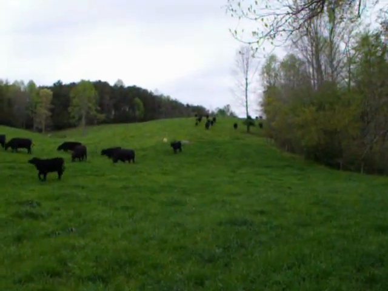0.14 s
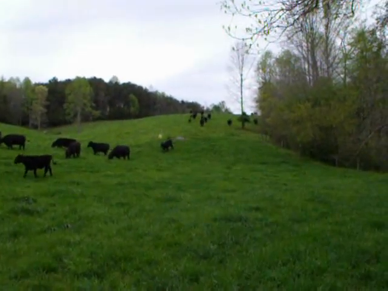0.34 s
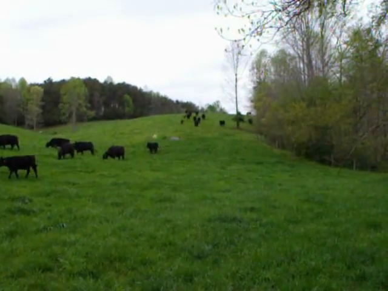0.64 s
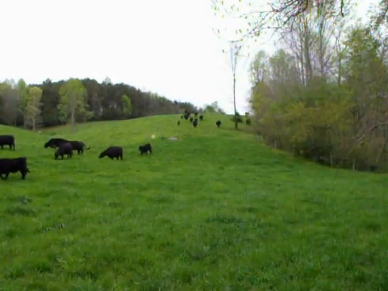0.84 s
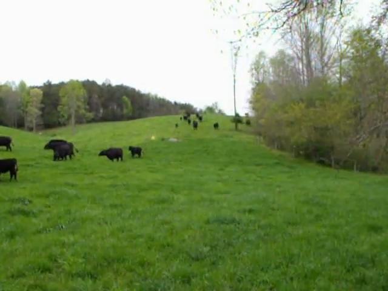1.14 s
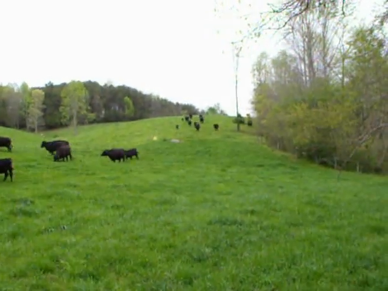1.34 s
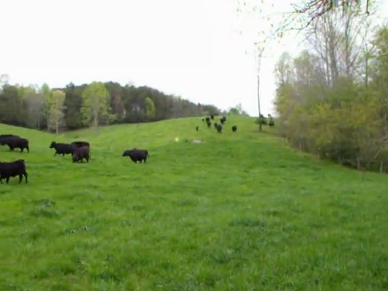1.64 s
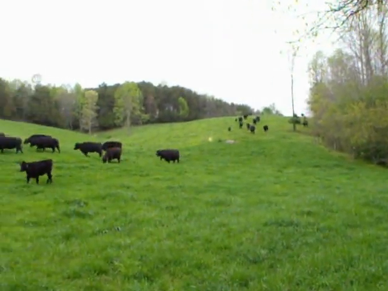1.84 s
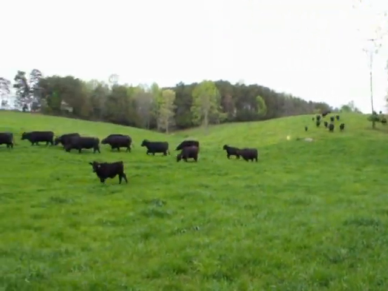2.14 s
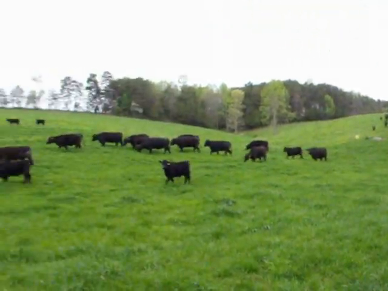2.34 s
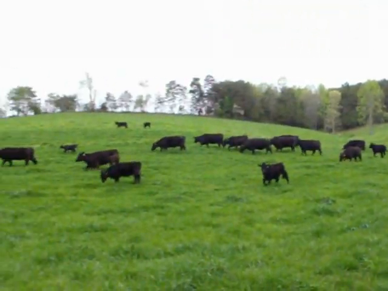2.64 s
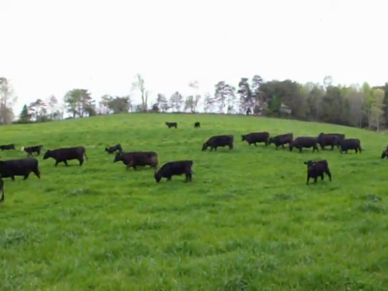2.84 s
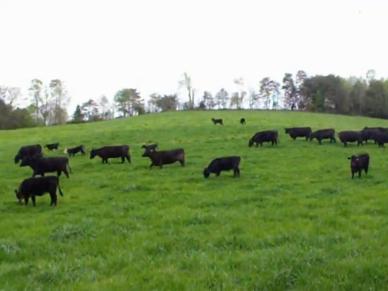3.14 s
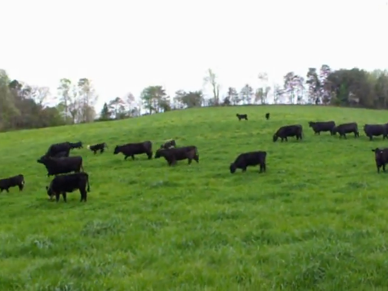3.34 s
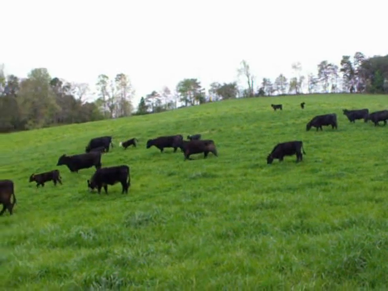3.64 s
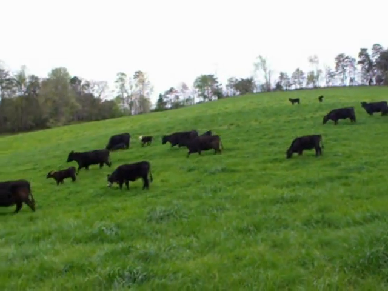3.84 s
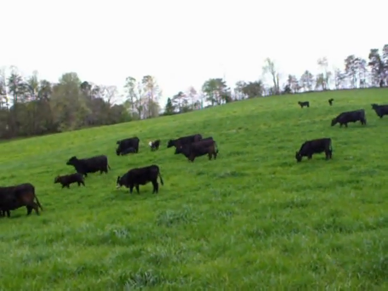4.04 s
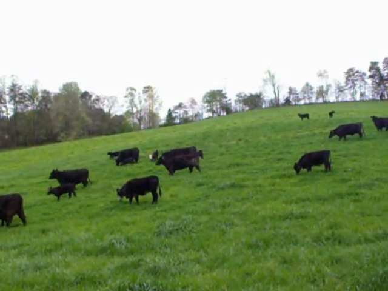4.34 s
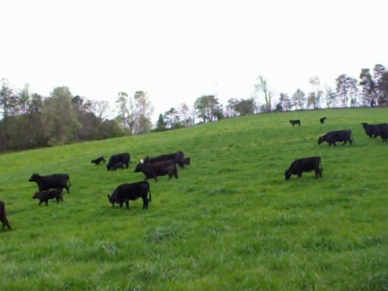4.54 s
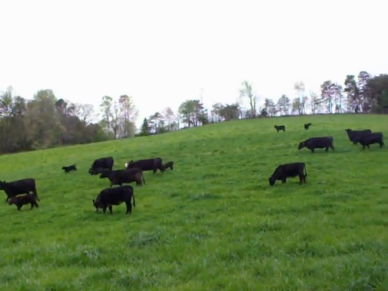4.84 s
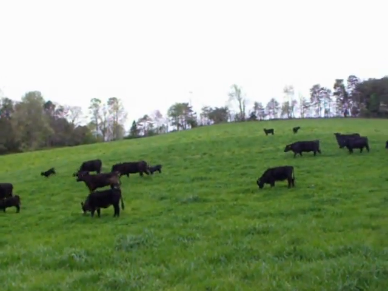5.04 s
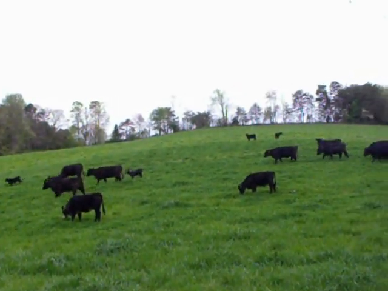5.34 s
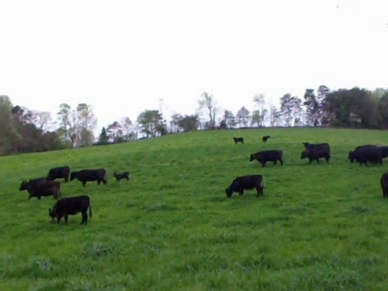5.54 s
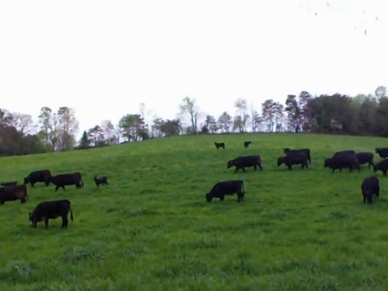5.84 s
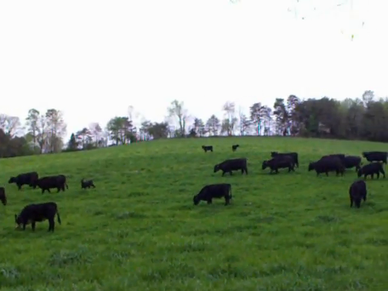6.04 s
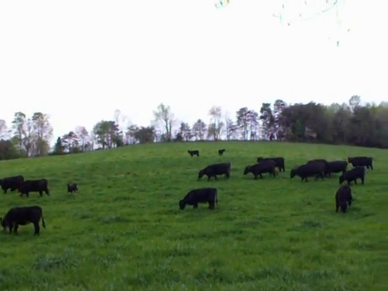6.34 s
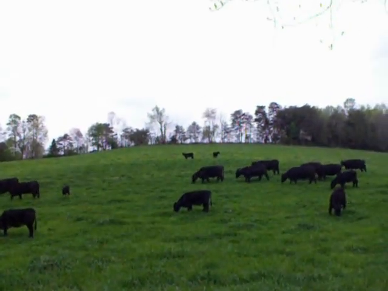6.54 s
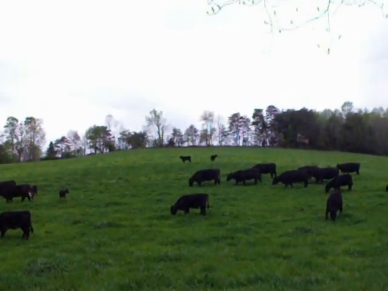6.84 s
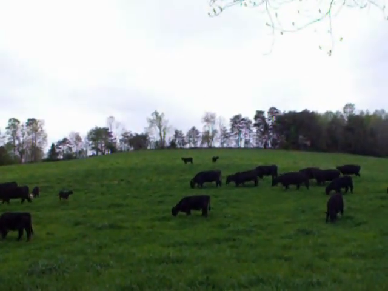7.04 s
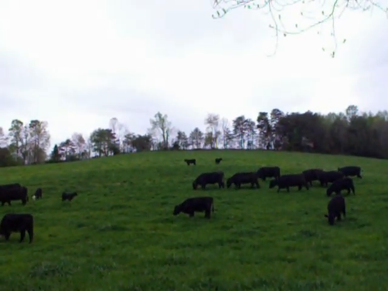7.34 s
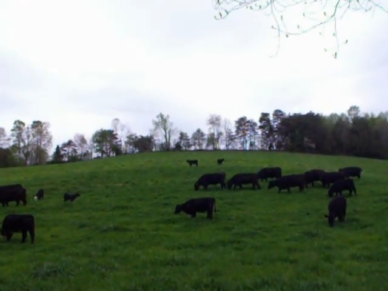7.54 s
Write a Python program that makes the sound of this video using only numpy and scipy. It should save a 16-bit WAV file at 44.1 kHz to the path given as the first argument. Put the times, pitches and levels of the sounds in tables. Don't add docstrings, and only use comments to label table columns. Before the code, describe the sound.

Calves bleat in short nasal calls while a cow hums into two moos and snorts, over windy grass, camera taps and steady hiss.

```python
import sys
import numpy as np
from scipy import signal
from scipy.fft import rfft, irfft, next_fast_len
from scipy.io import wavfile
from scipy.ndimage import uniform_filter1d, map_coordinates

SR = 44100
rng = np.random.default_rng(int(sys.argv[2]) if len(sys.argv) > 2 else 0)


def file_out(sig):
    cols = np.atleast_2d(sig).T
    lim = np.clip(cols, -1, 1)
    pcm = np.round(lim * 32767).astype(np.int16)
    wavfile.write(sys.argv[1], SR, pcm)


def amplitude_ratio(level_db):
    exponent = np.asarray(level_db, float) / 20
    return 10 ** exponent


N = 339129


def unit(x):
    return x / np.sqrt(np.mean(np.abs(x) ** 2) + 1e-20)


def along(points, hz):
    f, v = np.transpose(points)
    return np.interp(np.log(hz + 1), np.log(f + 1), v)


def wobble(rate, size):
    knots = rng.standard_normal(int(size * rate / SR) + 4)
    return map_coordinates(knots, [np.arange(size) * rate / SR])


def filtered(x, response):
    m = next_fast_len(N + SR // 2)
    return irfft(rfft(x, m) * response(np.fft.rfftfreq(m, 1 / SR)), m)[..., :N]


def resonate(modes, f):
    total = 0
    for k, (centre, width, db) in enumerate(modes):
        damping = 1j * f * width
        total = total + (-1) ** k * amplitude_ratio(db) * damping / (centre * centre - f * f + damping)
    return total


def rush(spectrum, patchy_db):
    z = signal.stft(rng.standard_normal(N), nperseg=512)[2]
    field = uniform_filter1d(rng.standard_normal(z.shape), size=8, axis=0)
    field = uniform_filter1d(field, size=8, axis=1)
    x = signal.istft(z * amplitude_ratio(patchy_db * unit(field)), nperseg=512)[1][:N]
    return unit(filtered(x, lambda hz: amplitude_ratio(along(spectrum, hz))))


def held(start, length, db, attack, release, edge_db):
    end = start + length
    return [(start, db + edge_db), (start + attack, db), (end - release, db), (end, db + edge_db)]


def unroll(rows, step=1):
    s, *cols = np.transpose(rows)
    t = np.arange(round(s[0] * SR), min(round(s[-1] * SR), N), step) / SR
    cut_off = s[-1] > N / SR - .01
    fade = np.clip(np.minimum(t - s[0], s[-1] + cut_off - t) / .015, 0, 1)
    return round(s[0] * SR), fade, [np.interp(t, s, c) for c in cols]


def shaped(calls, poses, gape):
    wide, narrow = np.array(gape)
    shaped_calls = []
    for rows, pose in zip(calls, poses):
        moved = []
        for s, hz, db, opening in rows:
            throat = np.array(pose) + max(opening, 0) * wide + min(opening, 0) * narrow
            moved.append((s, hz, db, *throat))
        shaped_calls.append(moved)
    return shaped_calls


def voice(calls, throat, pockets, facing_db, chest_db, rough, flicker_db, jitter):
    step = 32
    chest_gains = 0.76
    out = np.zeros(N)
    for rows, aim_db in zip(calls, facing_db):
        start, fade, (pitch, db, *_) = unroll(rows)
        slow, _, mouth, hump, muzzle, tongue, bright = unroll(rows, step=step)[2]
        cycles = np.cumsum(pitch * (1 + jitter * wobble(45, size=len(pitch)))) / SR
        stretch = muzzle / throat[4][0]

        modes = [(c, w, g + chest_db - chest_gains * aim_db) for c, w, g in throat[:2]]
        modes += [(mouth, *throat[2][1:])]
        modes += [(hump, throat[3][1], throat[3][2] + tongue)]
        modes += [(c * stretch, w, g + bright + aim_db * (c > 3500)) for c, w, g in throat[4:]]
        order = np.arange(1, 56)[:, None]
        f = order * slow
        weights = resonate(modes, f)
        for c, floor, rim in pockets:
            gap = (c * stretch) ** 2 - f * f
            weights = weights * (gap + 1j * f * floor) / (gap + 1j * f * rim)
        weights = weights / np.sqrt(np.sum(np.abs(weights[6:15]) ** 2, axis=0) / 2)

        slack = np.clip(-np.gradient(np.log(slow)) * SR / step, 0, 2.5)
        fray = rough + .14 * uniform_filter1d(slack, size=30)
        fine, coarse = np.arange(len(pitch)), np.arange(len(slow)) * step
        for k, w in zip(order[:, 0], weights):
            breath = wobble(110 * step, size=len(w)) + 1j * wobble(110 * step, size=len(w))
            w = w * (amplitude_ratio(flicker_db * wobble(12 * step, size=len(w))) + fray * breath)
            turn = 2 * np.pi * k * cycles
            wave = np.interp(fine, coarse, w.real) * np.cos(turn)
            wave = wave - np.interp(fine, coarse, w.imag) * np.sin(turn)
            out[start:start + len(wave)] -= wave * amplitude_ratio(db) * fade
    return out


def preamp_hiss():
    # hz, level_db (per Hz)
    hiss_spectrum = [(12, -14), (20, -18), (22, -14.5), (91, -8.5), (120, -8.5), (195, -13.5), (495, -5),
                     (732, -4.5), (982, -3.5), (1260, -4), (1490, -4), (4490, -6.5), (4950, -5.5),
                     (6170, -18.5), (6970, -45.5), (9060, -81.5), (15300, -120)]
    hiss_db, frame_hz = -34.5, 60000 / 1001
    t = np.arange(N) / SR
    frame = np.tanh(4 * np.sin(2 * np.pi * frame_hz * (t - .004)))
    return amplitude_ratio(hiss_db - 3.0 + 1.5 * frame) * rush(hiss_spectrum, patchy_db=1.32)


def preamp_whine():
    # pitch_hz, level_db (rms)
    tones = [(5012, -53.5), (6013, -63)]
    t = np.arange(N) / SR
    out = np.zeros(N)
    for hz, db in tones:
        out += np.sqrt(2) * amplitude_ratio(db) * np.sin(2 * np.pi * (hz * t + 0.23 * wobble(6, size=N)))
    return out


def wind():
    # time_s, level_db (strength in the grass)
    gusts = [(0.0, -34.5), (.5, -38), (.95, -37), (1.4, -32.5), (2.0, -36), (2.9, -37), (3.6, -34.5),
             (4.1, -40.5), (4.7, -41), (5.3, -38.5), (6.0, -41.5), (6.6, -56.5), (7.69, -52)]
    # time_s, lift_db, length_s
    flurries = [(0.068, 0.5, 0.066), (.75, 6.5, 0.068), (1.056, 3, 0.022), (1.26, 2, 0.052),
                (1.646, 5, 0.078), (1.82, 2.5, 0.036), (2.139, 5, 0.097), (2.37, 8, 0.09),
                (2.697, 7, 0.044), (3.398, 3, .05), (3.634, 7.5, .03), (3.78, 7.5, 0.033),
                (3.928, 8.5, .03), (4.034, 3, .04), (4.938, 4, .03), (5.024, 6, 0.033)]
    # hz, level_db (per Hz)
    grass_spectrum = [(300, -16.5), (700, -5.5), (1500, -3.5), (3000, -0.5), (4500, -0.5), (5500, 2),
                      (7500, -16)]
    # hz, level_db (per Hz)
    rumble_spectrum = [(20, -6.5), (60, -8.5), (200, -10.5), (600, -24), (1200, -33.5)]
    buffet_level_db, buffet_follows = -44, 0.07
    t = np.arange(N) / SR
    grass_db = np.interp(t, *np.transpose(gusts))
    for s, db, length in flurries:
        grass_db = grass_db + db * np.exp(-((t - s) / length) ** 2)
    buffet_db = buffet_level_db + buffet_follows * (grass_db - grass_db.mean())
    grass = amplitude_ratio(grass_db + 1.0 * wobble(30, size=N)) * rush(grass_spectrum, patchy_db=2.5)
    buffet = amplitude_ratio(buffet_db - 2.5 + 1.2 * wobble(9, size=N)) * rush(rumble_spectrum, patchy_db=0.5)
    return grass + buffet


def taps():
    # time_s, peak_db, pitch_hz, t60_s
    touches = [
        (0.4356, -25.5, 625, 0.014),
        (2.6756, -11, 3280, 0.014),
        (2.6869, -19, 2880, .008),
        (5.607, -25, 460, 0.042),
        (5.623, -32.5, 498, 0.056),
        (5.635, -28.5, 450, 0.069),
        (5.72, -25.5, 500, 0.11),
    ]
    out, t = np.zeros(N + SR), np.arange(SR // 10) / SR
    for s, db, hz, t60 in touches:
        puff = unit(signal.lfilter(*signal.iirpeak(hz, .7, SR), rng.standard_normal(len(t))))
        push = np.sin(2 * np.pi * hz * t) * (hz * t < 1)
        out[round(s * SR):][:len(t)] += amplitude_ratio(db) * (push + 0.66 * puff * amplitude_ratio(-60 * t / t60))
    return out[:N]


def treeline(x):
    t = np.arange(SR // 2) / SR
    tail = rng.standard_normal(len(t)) * amplitude_ratio(-60 * t / .5) * (t > .004)
    return signal.fftconvolve(x, tail / np.linalg.norm(tail))[:N]


def far_cows():
    # start_s, length_s, first_pitch_hz, held_pitch_hz, level_db
    hums = [
        (3.08, .48, 79.7, 97, -42.5),
        (5.6, .98, 69.1, 82.95, -47),
    ]
    # multiple of the pitch, level_db
    harmonics = [(1, -2.5), (2, -7.5), (3, -12.5)]
    rise_s, attack_s, release_s, edge_db = 0.3, .12, 0.13, -12
    out = np.zeros(N)
    for s, length, first_hz, held_hz, level_db in hums:
        start, fade, (db,) = unroll(held(s, length, level_db, attack_s, release_s, edge_db))
        pitch = np.interp(np.arange(len(fade)) / SR, [0, rise_s], [first_hz, held_hz])
        turn = 2 * np.pi * np.cumsum(pitch * (1 + .012 * wobble(14, size=len(fade)))) / SR
        hum = sum(amplitude_ratio(g + 1.1 * wobble(5.7, size=len(fade))) * np.sin(k * turn) for k, g in harmonics)
        out[start:start + len(fade)] += np.sqrt(2) * fade * amplitude_ratio(db) * hum
    return out


def snort():
    # start_s, length_s, level_db
    puffs = [
        (3.729, .12, -29.5),
        (3.843, 0.11, -23),
    ]
    # centre_hz, width_hz, level_db
    nose = [(340, 250, -12.5), (800, 110, -6), (990, 150, -0.5), (2040, 570, -5), (3010, 155, 0),
            (4380, 850, -16)]
    # time_s, level_db, pitch_hz, length_s
    whistles = [
        (3.899, -26.5, 990, 0.012),
        (3.918, -21.5, 800, 0.0065),
        (3.929, -17.5, 1986, 0.0084),
    ]
    attack_s, release_s, edge_db = 0.041, 0.029, -14.5
    flutter = amplitude_ratio(1.6 * wobble(120, size=N))
    air = unit(filtered(rng.standard_normal(N) * flutter, lambda f: resonate(nose, f)))
    out, t = np.zeros(N), np.arange(N) / SR
    for puff in puffs:
        start, fade, (db,) = unroll(held(*puff, attack_s, release_s, edge_db))
        out[start:start + len(fade)] += air[start:start + len(fade)] * amplitude_ratio(db) * np.sqrt(fade)
    for s, db, hz, length in whistles:
        swell = np.exp(-((t - s) / length) ** 2)
        out += amplitude_ratio(db) * swell * np.sin(2 * np.pi * hz * (t - s) * (1 + 2.6 * (t - s)))
    return out


def cow_mouth_shut():
    # time_s, pitch_hz, level_db, lip opening (-1..1)
    calls = [
        [(2.86, 93.4, -47, -0.46), (2.894, 100.5, -40.5, -1), (3.026, 113.9, -40, -0.25),
         (3.098, 119.1, -38.5, -0.37), (3.174, 132.9, -37.5, 0.045), (3.22, 135.2, -36.5, -0.04),
         (3.31, 137.1, -36, 0.068)],
        [(4.65, 107.4, -61, 0), (4.78, 109.4, -49.5, -0.021), (4.902, 109.9, -44, 0.077),
         (5.014, 121.3, -39, 0), (5.102, 118, -41, -.2), (5.19, 125, -38, 0)],
        [(5.76, 140.3, -34, -.1), (5.824, 141, -37.5, .1), (5.97, 139.5, -39.5, .1), (6.06, 133.6, -52, .05)],
    ]
    # centre_hz, width_hz, level_db
    throat = [(215, 90, -5), (700, 200, -22), (1380, 170, 0), (1000, 200, -4), (2620, 90, 4),
              (4170, 170, 6), (6900, 400, -12)]
    # mouth_hz, tongue_hz, muzzle_hz, tongue_db, bright_db
    poses = [(1430, 1000, 2660, -3, -3.5), (1405, 990, 2620, -2, -16.5), (1210, 1660, 2260, 6, -14)]
    gape = [(30, 15, 15, 5, 6.6), (30, 15, 60, 5.4, 14)]
    return voice(shaped(calls, poses, gape), throat, [], np.zeros(len(calls)), 0,
                 rough=.07, flicker_db=1.5, jitter=.001)


def cow_mouth_open():
    # time_s, pitch_hz, level_db, mouth opening (-1..1)
    calls = [
        [(3.31, 138.5, -47, 0), (3.36, 139.4, -34.5, -.3), (3.42, 139.6, -35.5, -.3),
         (3.468, 138.2, -26.5, 0.16), (3.54, 136, -28.5, 0.43), (3.6, 137.6, -24, -0.17),
         (3.652, 132.2, -27.5, -0.11), (3.736, 127, -34.5, -0.38), (3.77, 118, -46, 0)],
        [(5.11, 119.6, -42.5, 0.53), (5.22, 127.9, -33, 0.49), (5.304, 137.2, -27.5, 0.8),
         (5.388, 139.4, -29.5, 0.74), (5.46, 137.6, -29.5, -.3), (5.57, 144.6, -26, 0.2),
         (5.706, 151.5, -25.5, 0.13), (5.735, 149.5, -25.5, -0.82), (5.78, 132.5, -34, -0.44)],
    ]
    # centre_hz, width_hz, level_db
    throat = [(145, 160, -16.5), (436, 51, -7), (1150, 60, 3.5), (1652, 114, -7.5), (2240, 60, -6),
              (2760, 86, -10.5), (3445, 150, -19), (4300, 600, -33.5)]
    # mouth_hz, tongue_hz, muzzle_hz, tongue_db, bright_db
    poses = [(1101, 1620, 2180, 1.5, 2), (1125, 1670, 2240, 1.5, -3)]
    gape = [(110, 30, 17, 4, 6.6), (90, 15, 15, -4.5, 1.5)]
    return voice(shaped(calls, poses, gape), throat, [], np.zeros(len(calls)), -3.5,
                 rough=.1, flicker_db=2, jitter=.0012)


def calf():
    # time_s, pitch_hz, level_db, mouth opening (-1..1)
    calls = [
        [(1.47, 146, -53, .1), (1.526, 139.7, -27, -0.14), (1.586, 135, -23, 0.24), (1.642, 141.4, -23.5, -.3),
         (1.676, 137.8, -22.5, 0.065), (1.708, 127.4, -27, 0.00049), (1.76, 125.7, -45, .1)],
        [(2.2, 120.4, -44, -.8), (2.312, 131.5, -22, -.8), (2.395, 130.4, -22.5, -0.9),
         (2.455, 135, -22.5, -0.51), (2.495, 135.7, -21.5, .1), (2.556, 126.6, -21.5, -0.12),
         (2.6, 135.7, -20, .2), (2.635, 127, -22.5, 0.43), (2.67, 111.5, -36, .6)],
        [(3.23, 121.2, -44, -0.37), (3.28, 126.7, -30, -0.4), (3.33, 131.8, -19.5, -0.12),
         (3.39, 134.7, -18.5, .05), (3.44, 131.5, -20, 0.5), (3.49, 126.3, -24.5, 0.72),
         (3.53, 131.5, -20.5, 0.91), (3.575, 138.5, -22.5, 0.85), (3.66, 129.7, -44.5, 0.59)],
        [(7.37, 121, -51.5, .2), (7.414, 126.9, -33.5, 0.24), (7.462, 133.3, -28, -.05),
         (7.568, 136.9, -19, 0.19), (7.69, 140.7, -19, 0.21)],
    ]
    # centre_hz, width_hz, level_db
    throat = [(535, 70, -15), (900, 260, -20), (1340, 85, 0), (1780, 95, -2), (2500, 90, -3),
              (3050, 85, -11.5), (3740, 240, -18), (4680, 280, -17), (6250, 500, -24)]
    # centre_hz, floor_width_hz, rim_width_hz
    pockets = [(2040, 110, 480), (3290, 110, 420)]
    facing = [-2, -5.5, -3, -0.5]
    # mouth_hz, tongue_hz, muzzle_hz, tongue_db, bright_db
    poses = [(1363, 1775, 2490, 3.5, 4.5), (1309, 1698, 2575, 1.5, -1.5), (1343, 1720, 2540, 3, -0.5),
             (1364, 1770, 2450, 4.5, 2)]
    gape = [(150, 150, 130, 0.5, 0.5), (15, 15, 130, 13, 0.5)]
    return voice(shaped(calls, poses, gape), throat, pockets, facing, -3.5,
                 rough=.11, flicker_db=1.5, jitter=.0012)


def scene():
    herd = calf() + cow_mouth_open() + cow_mouth_shut() + far_cows() + snort()
    return (herd + amplitude_ratio(-19) * treeline(herd) + taps() + wind())[None]


def roll_off(x):
    return signal.sosfilt(signal.butter(12, 7120, fs=SR, output="sos"), x)


def record(dry):
    # hz, level_db
    band_limit = [(4800, 0.5), (5250, -4.5), (5600, -10), (6200, -10.5), (6700, -18), (7000, -39),
                  (7300, -85)]
    pasture = filtered(dry, lambda hz: amplitude_ratio(along(band_limit, hz)))
    electronics = filtered(preamp_hiss() + preamp_whine(), lambda hz: hz < 7400)
    x = pasture + electronics - .0037
    return roll_off(x + amplitude_ratio(-92.5) * rng.standard_normal(N))


dry = scene()
out = record(dry)
file_out(out)
```